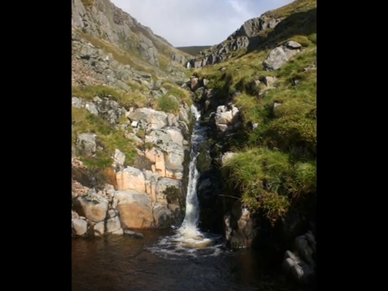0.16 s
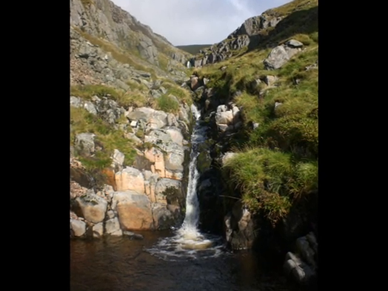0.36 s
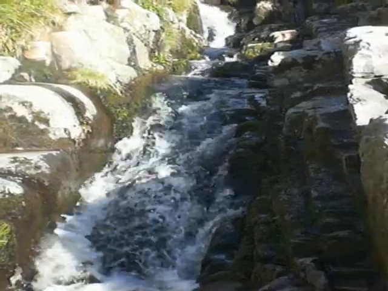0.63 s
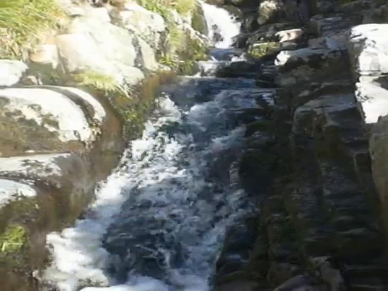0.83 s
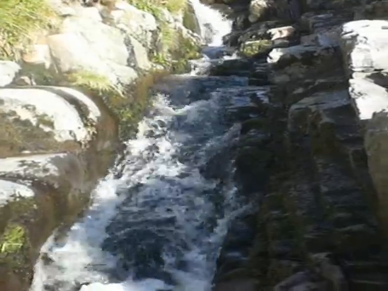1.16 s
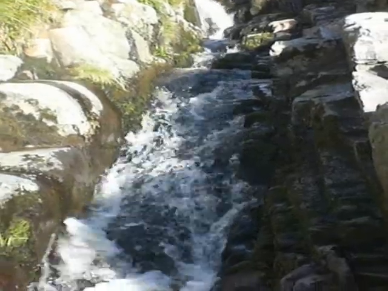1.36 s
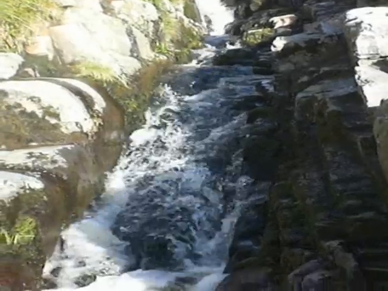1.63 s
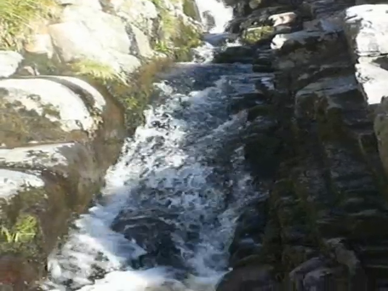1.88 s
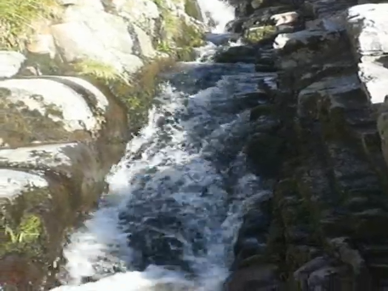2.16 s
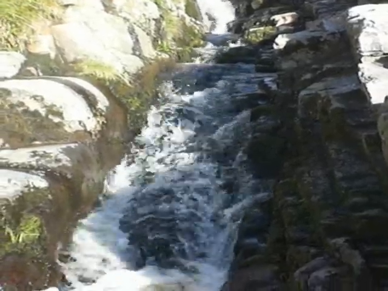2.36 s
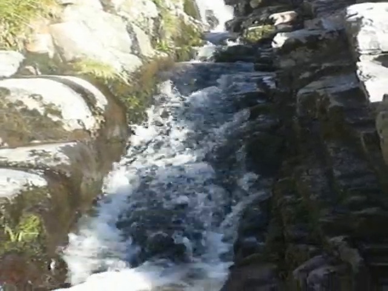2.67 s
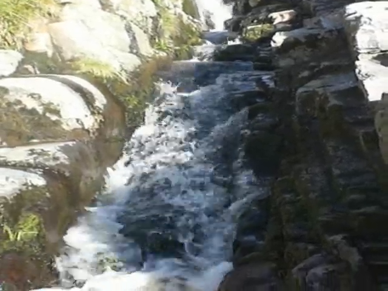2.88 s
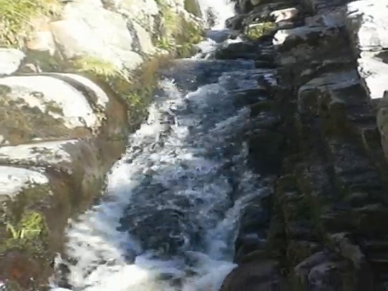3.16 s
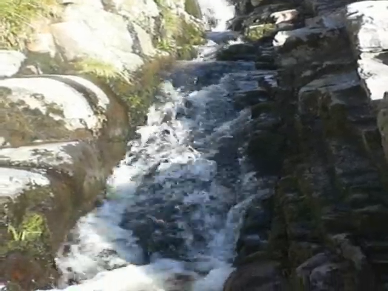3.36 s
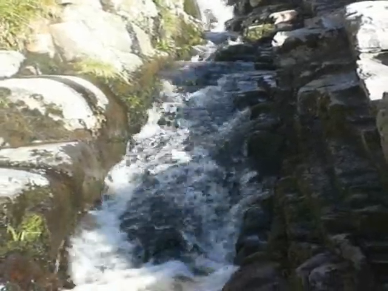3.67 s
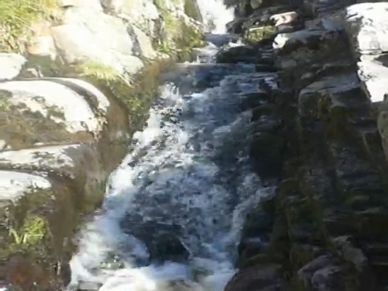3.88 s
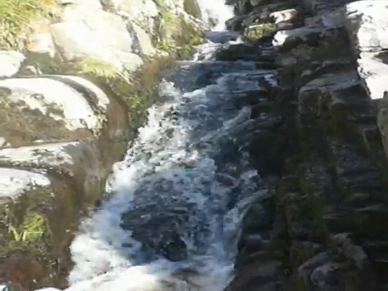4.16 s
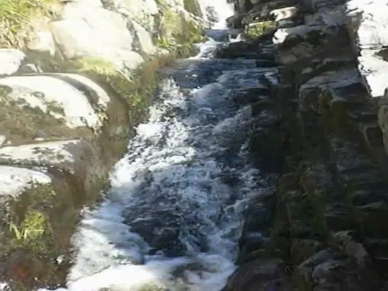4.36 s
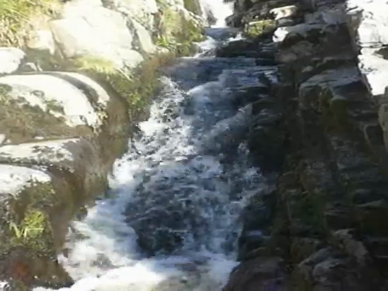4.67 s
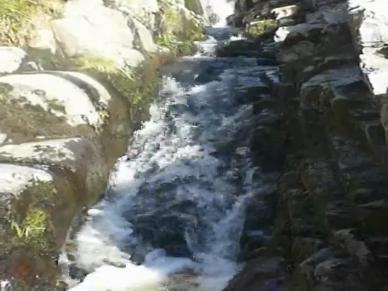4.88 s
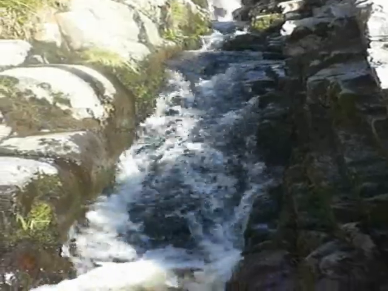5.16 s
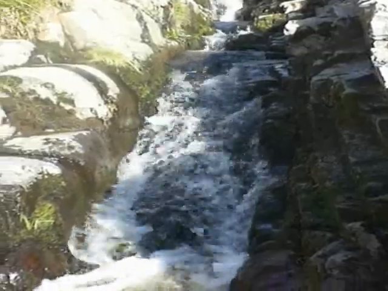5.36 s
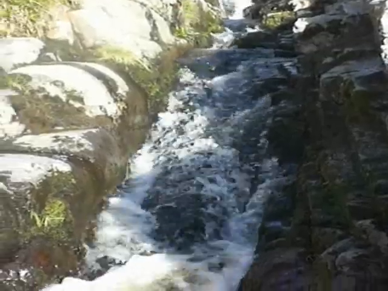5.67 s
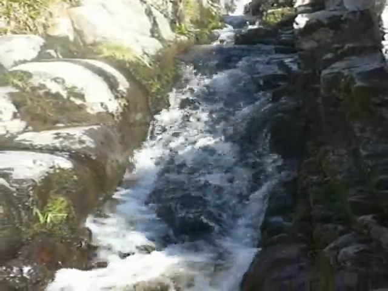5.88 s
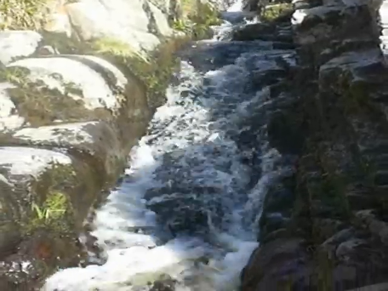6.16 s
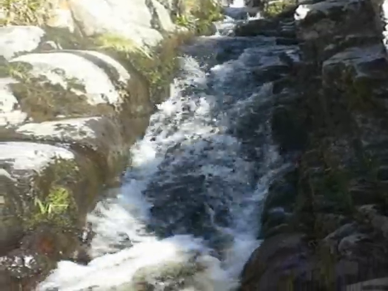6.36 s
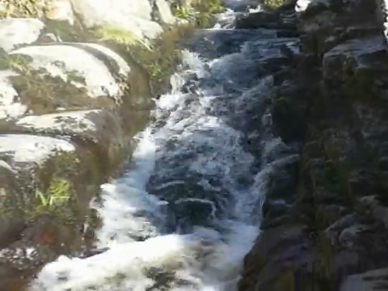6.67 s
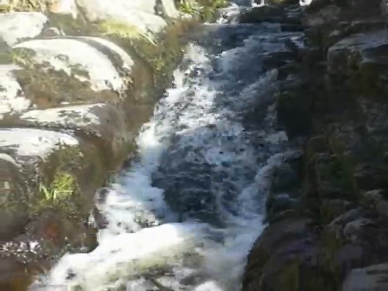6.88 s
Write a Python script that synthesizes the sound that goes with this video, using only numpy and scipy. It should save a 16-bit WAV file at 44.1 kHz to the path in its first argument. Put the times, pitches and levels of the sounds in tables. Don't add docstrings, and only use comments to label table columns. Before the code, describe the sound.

Loud, broad water rush with crackling spray and small bubbling glugs, fading in quickly and ending in rough, rumbling wind gusts.

```python
import sys
import numpy as np
from scipy import signal
from scipy.io import wavfile
from scipy.ndimage import uniform_filter1d

SR = 44100
rng = np.random.default_rng(int(sys.argv[2]) if len(sys.argv) > 2 else 0)


def pcm_store(signal):
    levels = np.round(np.clip(np.atleast_2d(signal), -1, 1) * 32767)
    wavfile.write(sys.argv[1], SR, levels.astype(np.int16).T)


def nominal_scale(level):
    x = np.asarray(level, float) / 20
    return 10 ** x


N = 309582
START_S = .7445


def curves(rows):
    s, *columns = np.transpose(rows)
    return [np.interp(np.arange(N) / SR, s, column) for column in columns]


def rms_one(x):
    return x / np.sqrt(np.mean(x ** 2) + 1e-20)


def drift(rate):
    r = np.exp(-80 * np.pi * rate / SR)
    noise = rng.standard_normal(N // 40 + 2002)
    slow = signal.lfilter([1], [1, -2 * r, r * r], noise)[2000:]
    return np.interp(np.arange(N) / 40, np.arange(len(slow)), rms_one(slow))


def butter(x, hz, kind, order=2):
    return signal.sosfilt(signal.butter(order, hz, kind, fs=SR, output="sos"), x)


def scattered(per_s, peak_db, spread_db, low_hz, high_hz, count=80):
    gap, size, pitch = rng.random((count, 3)).T
    s = START_S + np.cumsum(-np.log(1 - gap) / per_s)
    level_db = peak_db + spread_db * (2 * size - 1)
    rows = np.c_[s, level_db, low_hz * (high_hz / low_hz) ** pitch]
    return list(rows[s < N / SR])


def add(track, s, sound):
    i = round(s * SR) - len(sound) // 2
    track[i:i + len(sound)] += sound[:N - i]


def rush(surge_db, near_db, flicker_db, hiss_db, rumble_db):
    # f/Hz, level/dB (per Hz)
    spectrum = [(25, -39), (60, -50), (113, -17.5), (240, -6), (333, -4), (500, -0.5), (630, -3.5),
                (950, -0.5), (1400, -4), (2500, -5.5), (3100, -8), (6500, -13), (9200, -12.5),
                (14000, -13.5)]
    table_hz, table_db = np.transpose(spectrum)
    edges = 25 * 2 ** np.arange(0, 9.4, 1 / 3)
    white, surge, out = rng.standard_normal((2, N)), drift(2.3), 0
    near = [drift(1.3) for k in range(len(edges) // 4 + 2)]
    for k, (low, high) in enumerate(zip(edges, edges[1:])):
        centre = np.log(low * high) / 2
        level_db = np.interp(centre, np.log(table_hz), table_db)
        level_db = level_db + hiss_db * (high > 3500) + rumble_db * (low < 600)
        share = k % 4 / 4
        patch = (1 - share) * near[k // 4] + share * near[k // 4 + 1]
        gain_db = level_db + surge_db * surge + near_db * patch + flicker_db * drift(27.0)
        out = out + nominal_scale(gain_db) * butter(white[k % 2], [low, high], "band")
    return rms_one(out)


def grains(per_s, low_hz, high_hz, cycles, spread_db, tilt_db, count=24):
    sizes = nominal_scale(spread_db * np.minimum(rng.exponential(1, N), 4.0)) * rng.choice([-1, 1], N)
    clicks = sizes * (rng.random(N) < per_s / SR)
    dealt, out = rng.integers(0, count, N), 0
    for k, hz in enumerate(np.geomspace(low_hz, high_hz, count)):
        r = nominal_scale(-60 * hz / (cycles * SR))
        w = 2 * np.pi * hz / SR
        struck = clicks * (dealt == k) + 1e-18
        ring = signal.lfilter([0, np.sin(w)], [1, -2 * r * np.cos(w), r * r], struck)
        out = out + nominal_scale(tilt_db * np.log2(hz / low_hz)) * ring
    return rms_one(out)


def hollows(x):
    # f/Hz, width/Hz, level/dB
    cavities = [
        (241, 23, -10),
        (510, 34, -8),
    ]
    out = x
    for hz, width, db in cavities:
        out = out + nominal_scale(db) * signal.lfilter(*signal.iirpeak(hz, hz / width, fs=SR), x)
    return out


def drops():
    # t/s, peak level/dB, f/Hz
    smacks = [(0.818, -11, 3900), (.8186, -16, 8000), (1.41, -14, 3215), (1.569, -13.5, 4500),
              (2.207, -29, 6431), (2.459, -13, 3215), (2.526, -16, 10106), (3.029, -15, 9417),
              (3.158, -14.5, 9000), (3.275, -21, 4823), (3.797, -18.5, 9417), (3.862, -21, 6820),
              (4.184, -16, 5053), (4.243, -26, 6660), (4.261, -14, 6431), (4.471, -14, 5240),
              (4.697, -18, 5282), (4.706, -15, 5053), (4.856, -11, 3660), (5.078, -12, 9000),
              (5.245, -16, 6201), (5.374, -22, 6201), (6.033, -16, 7120), (6.17, -13, 7120),
              (6.302, -18, 4593), (6.366, -17, 4364), (6.458, -15, 6890), (6.763, -13, 9400),
              (6.9535, -13, 9800)]
    # rate/(1/s), peak level/dB, spread/dB, lowest f/Hz, highest f/Hz
    lesser = (4.0, -21, 5.5, 3900, 10500)
    out, t = np.zeros(N), np.arange(-130, 130) / SR + 0.000505
    for s, peak_db, hz in [*smacks, *scattered(*lesser)]:
        decay = (t > 0) * np.exp(-np.abs(t) / 0.00059)
        add(out, s, nominal_scale(peak_db + 8.5) * np.sin(2 * np.pi * hz * t) * decay)
    return out


def pockets():
    # t/s, f/Hz
    largest = [(1.239, 840), (1.26, 1770), (1.355, 950), (1.701, 400), (2.406, 238), (3.352, 930),
               (3.454, 1840), (3.721, 1120), (3.872, 825), (4.078, 600), (4.188, 920), (4.22, 1873),
               (4.267, 955), (4.58, 1507), (4.78, 1740), (4.795, 493), (4.807, 1180), (4.949, 2350),
               (5.024, 380), (5.294, 1840), (5.474, 797), (5.526, 1020), (6.15, 1295), (6.194, 500),
               (6.298, 372), (6.316, 1210), (6.531, 410), (6.598, 1442), (6.603, 1701)]
    # rate/(1/s), peak level/dB, spread/dB, lowest f/Hz, highest f/Hz
    lesser = (6.5, -24, -5.5, 494, 3004)
    large_db = -17.5
    out, t = np.zeros(N), np.maximum(np.arange(-1500, 1500) / SR + .006, 0)
    shape = (1 - np.exp(-t / 0.0019)) * np.exp(-t / 0.0075) * 2
    every = [(s, large_db, hz) for s, hz in largest] + scattered(*lesser)
    for (s, peak_db, hz), turn in zip(every, rng.random(200)):
        cycles = hz * (.985 * t + 1.54 * t ** 2) + turn
        add(out, s, nominal_scale(peak_db) * shape * np.sin(2 * np.pi * cycles))
    return out


def wind():
    # t/s, rumble level at the crest/dB
    crests = [(5.55, -59), (5.64, -34), (5.71, -34), (5.78, -33), (5.915, -36), (6.05, -30), (6.285, -30),
              (6.4, -32), (6.49, -23.5), (6.63, -31), (6.715, -25), (6.81, -16.5), (6.925, -22),
              (6.99, -19.5)]
    # t/s, peak level/dB, f/Hz
    eddies = [(5.639, -35, 130), (5.801, -30, 111), (6.044, -24, 137), (6.063, -22, 158), (6.085, -21, 120),
              (6.129, -24, 158), (6.289, -26, 133), (6.334, -27, 158), (6.456, -25, 138),
              (6.49, -16.5, 156), (6.627, -20, 166), (6.7043, -14, 417), (6.71, 0, 300), (6.717, -3.5, 307),
              (6.795, -17, 300), (6.803, -14, 260), (6.808, -5, 239), (6.816, -14, 195), (6.826, -7, 176),
              (6.841, -8.5, 202), (6.849, -10, 231), (6.86, -1.5, 236), (6.889, -13, 240), (6.91, -10, 269),
              (6.925, -9, 153), (6.941, -10, 173), (6.985, -9, 150), (7, -6, 140), (7.009, -14.5, 130)]
    rise_db_s, fall_db_s = 420, 110
    breeze_from_s, breeze_db, breeze_grows_db_s = 5.5, -43, 2
    lull_s, lull_half_s = 6.22, .05
    flutter_db, flutter_full_db = -4, -19.5
    now = np.arange(N) / SR

    lumps = butter(butter(rng.standard_normal(N), 175, "low"), 50, "high") * nominal_scale(1.6 * drift(22.0))
    gusts = 0
    for s, db in crests:
        gusts = gusts + nominal_scale(db + np.minimum(rise_db_s * (now - s), fall_db_s * (s - now))) ** 2
    blowing = (now > breeze_from_s) * (abs(now - lull_s) > lull_half_s)
    breeze = nominal_scale(breeze_db + breeze_grows_db_s * (now - breeze_from_s)) * blowing
    out = np.sqrt(gusts + uniform_filter1d(breeze, size=1500) ** 2) * rms_one(lumps)

    flutter = rms_one(butter(rng.standard_normal(N), [140, 420], "band") * nominal_scale(2.5 * drift(40.0)))
    out = out + nominal_scale(flutter_db - flutter_full_db) * gusts * flutter

    chance, t = rng.random((len(eddies), 2)), np.arange(-1200, 1200) / SR
    ragged = rms_one(butter(rng.standard_normal(N), 610, "low"))
    for (s, peak_db, hz), (turn, where) in zip(eddies, chance):
        swell = np.exp(-(t * hz / np.where(t < 0, .52, .62)) ** 2)
        edge = ragged[int(where * (N - len(t))):][:len(t)]
        swing = np.cos(2 * np.pi * (hz * t + turn)) + 0.26 * edge
        add(out, s, nominal_scale(peak_db + 4.5) * swell * swing)
    return butter(out, 34, "high")


def scene():
    # t/s, rush level/dB
    flow = [(.74, -18.5), (1.0, -20), (1.3, -20), (1.55, -19.5), (1.8, -19), (2.2, -19.5), (3.0, -19.5),
            (3.8, -19.5), (4.1, -19.5), (4.4, -19), (4.65, -19), (4.9, -19.5), (5.25, -18.5), (5.6, -19.5),
            (6.0, -19), (6.6, -19), (6.85, -18.5), (7.02, -21)]
    hiss_follows, rumble_follows = 0.44, 0.27
    rumble_wander_db = 1.1
    flow_db, = curves(flow)
    swing_db = flow_db - np.median(flow_db)
    hiss_db = (hiss_follows - 1) * swing_db
    rumble_db = (rumble_follows - 1) * swing_db + rumble_wander_db * drift(0.74)

    bubbles = rush(0.48, 0.53, 0.98, hiss_db, rumble_db)
    churn = nominal_scale(2.5 * drift(6.0))
    glugs = grains(500 * churn, 222, 2630, cycles=15.4, spread_db=2.5, tilt_db=5.5)
    bursts = nominal_scale(3.0 * drift(30.0))
    spray = grains(1500 * bursts, 2700, 12700, cycles=3.2, spread_db=4.0, tilt_db=5.5)
    water = bubbles + nominal_scale(-10.0) * glugs + nominal_scale(-8 + hiss_db) * spray
    water = butter(hollows(water), 81, "high")
    return (nominal_scale(flow_db + 2.5) * water + pockets() + drops() + wind())[None]


def gain_control(x, above_db, ratio, release_db_s, attack_hz):
    power = uniform_filter1d(butter(x, 600, "low") ** 2, size=220)
    level_db = 10 * np.log10(power + 1e-12)
    ramp = release_db_s * np.arange(N) / SR
    wanted_db = ratio * np.maximum(level_db - above_db, 0)
    cut_db = np.maximum.accumulate(wanted_db + ramp) - ramp
    r = np.exp(-2 * np.pi * attack_hz / SR)
    return x * nominal_scale(-signal.lfilter([1 - r], [1, -r], cut_db))


def band_limit(x):
    return signal.sosfilt(signal.butter(12, 13870, fs=SR, output="sos"), x)


def record(dry):
    # f/Hz, width/Hz
    notches = [
        (7268, 190),
        (7852, 190),
    ]
    # t/s, f/Hz
    top_edge = [(0.74, 12500), (1.3, 12700), (3.3, 12400), (3.9, 12500), (4.2, 12000), (4.8, 11740),
                (5.95, 11870), (6.05, 11630), (6.4, 11420), (7.02, 11830)]
    fade_from_s, fade_full_s = 0.67, 1.263
    now = np.arange(N) / SR
    x = gain_control(dry[0], above_db=-15.5, ratio=0.45, release_db_s=54.5, attack_hz=25)
    for hz, width in notches:
        x = signal.lfilter(*signal.iirnotch(hz, hz / width, fs=SR), x)
    x = x / (1 + (x / .93) ** 4) ** .25
    hz, s, cells = signal.stft(x, SR, nperseg=3072)
    cells = cells * (hz[:, None] < np.interp(s, *np.transpose(top_edge)))
    x = signal.istft(cells, SR, nperseg=3072)[1][:N]
    fade = np.clip((now - fade_from_s) / (fade_full_s - fade_from_s), 0, 1)
    x = x * np.sin(np.pi / 2 * fade)
    x = x * np.clip((now - START_S) / 0.0014, 0, 1) ** 2
    return band_limit(x[None])


dry = scene()
out = record(dry)
pcm_store(out)
```